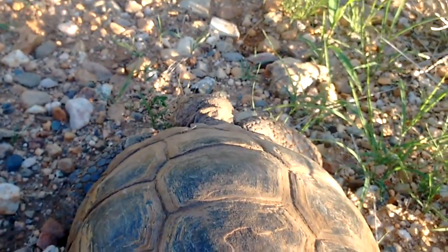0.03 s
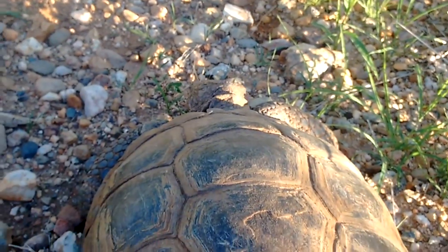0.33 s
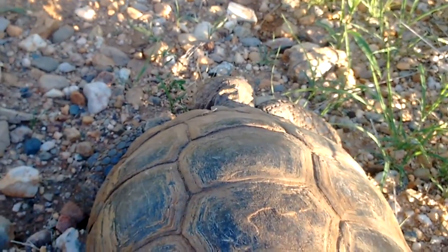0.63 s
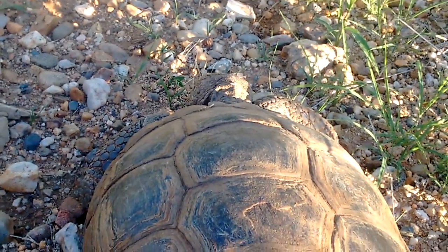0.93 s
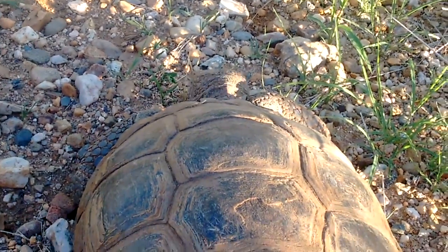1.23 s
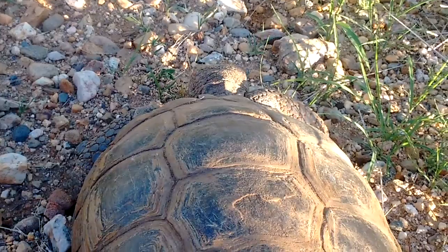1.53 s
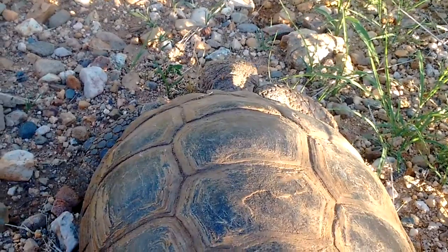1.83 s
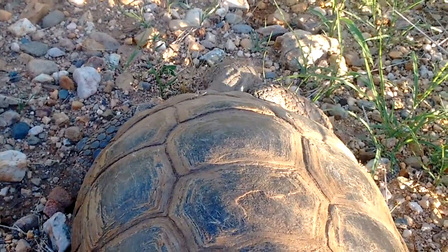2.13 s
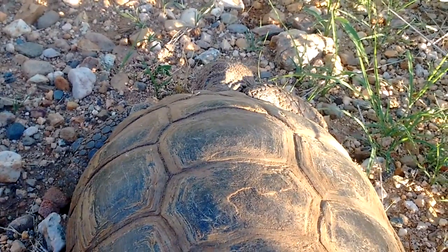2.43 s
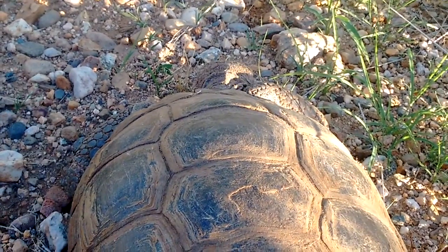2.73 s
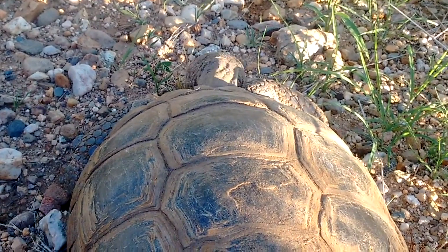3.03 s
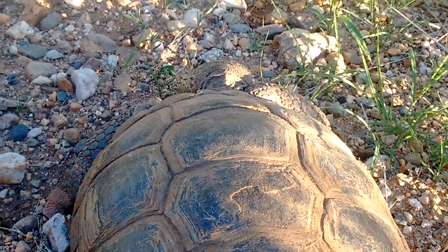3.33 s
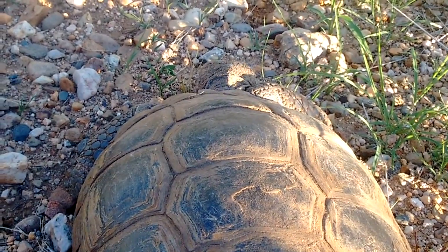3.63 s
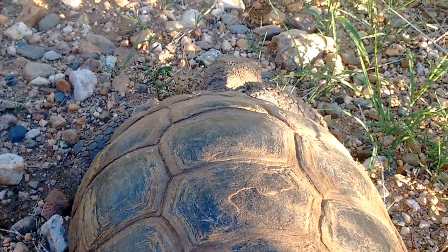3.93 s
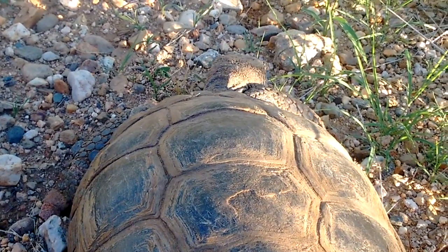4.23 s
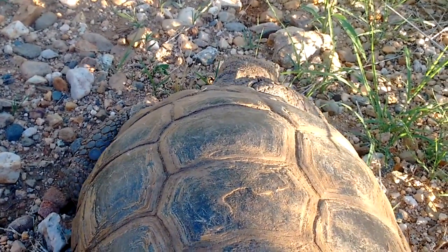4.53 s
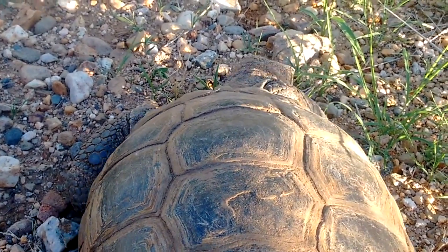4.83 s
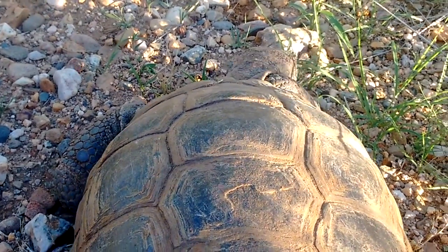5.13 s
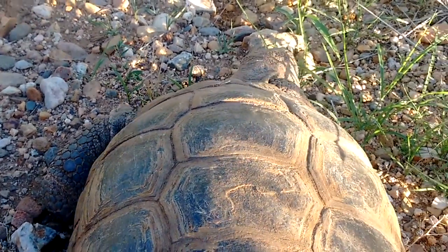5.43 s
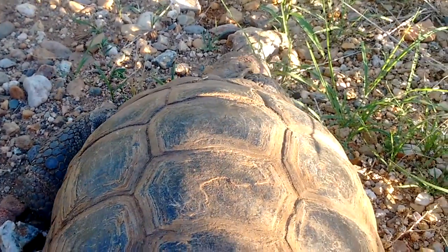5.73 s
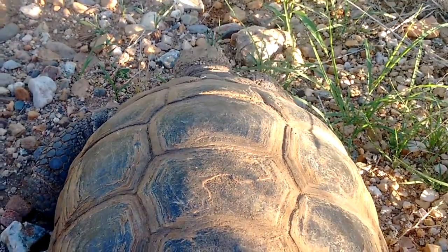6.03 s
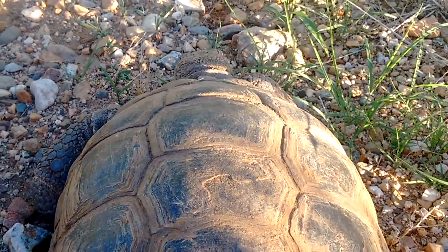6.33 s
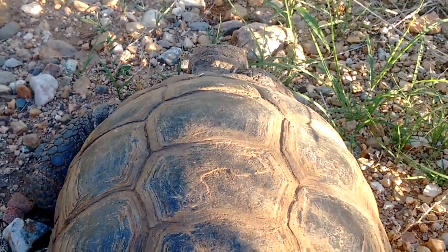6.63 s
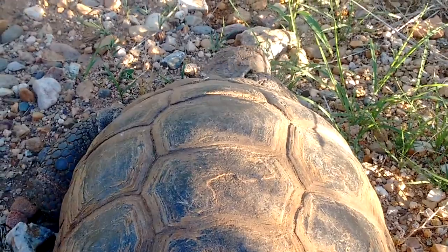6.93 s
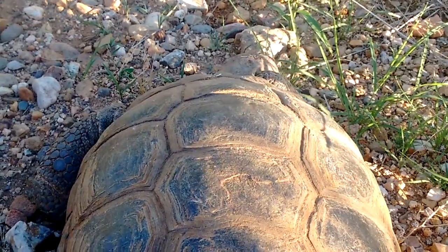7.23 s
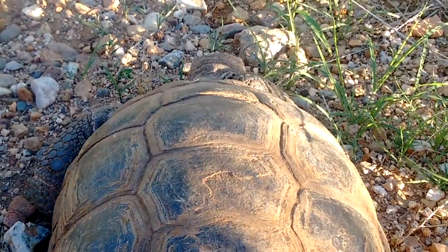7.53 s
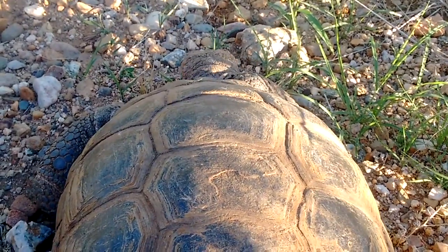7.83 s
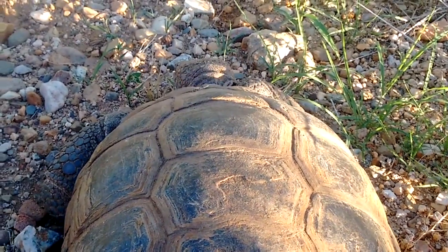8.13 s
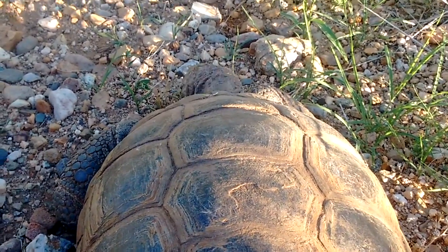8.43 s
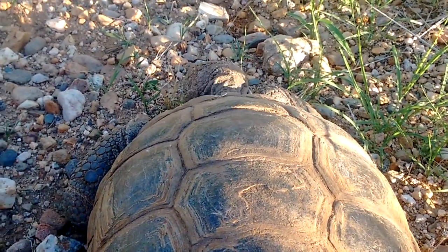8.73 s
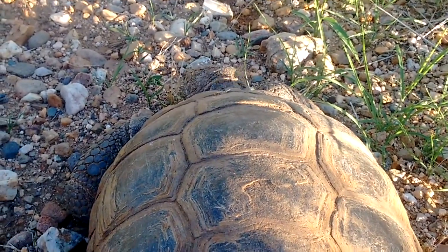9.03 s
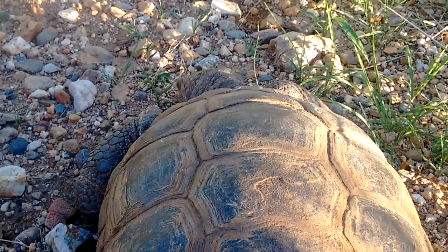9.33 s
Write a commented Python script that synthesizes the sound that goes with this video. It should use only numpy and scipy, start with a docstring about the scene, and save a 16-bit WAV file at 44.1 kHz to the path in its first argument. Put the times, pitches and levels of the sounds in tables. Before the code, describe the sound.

A tortoise faintly clicks and scuffs over gravel while a small bird chirps, until a loud wind gust buffets the microphone.

```python
"""A tortoise on dry gravel

A tortoise shifts its weight close to a pair of small microphones. Its feet scuff the grit and rub and
knock pebbles together, and its shell drags once over the stones. Further off, a small bird whistles two
phrases and there is one faint hoot. The air is nearly still until a gust buffets the microphones late on."""
import sys
import numpy as np
from scipy import signal
from scipy.fft import rfft, irfft, next_fast_len
from scipy.io import wavfile
from scipy.ndimage import uniform_filter1d

SR = 44100
rng = np.random.default_rng(int(sys.argv[2]) if len(sys.argv) > 2 else 0)


def waveform_to_disk(signal):
    """Save audio, clipped to [-1, 1], as 16-bit WAV at the path in sys.argv[1]."""
    frames = np.transpose(np.atleast_2d(signal))
    scaled = np.clip(frames, -1, 1) * 32767
    samples = np.round(scaled).astype(np.int16)
    wavfile.write(sys.argv[1], SR, samples)


N = 414099
TIME = np.arange(N) / SR
FFT_SIZE = next_fast_len(N + 4096)
FREQS = np.maximum(np.arange(FFT_SIZE // 2 + 1) * SR / FFT_SIZE, 1)


def from_db(db):
    """Turn decibels into a number to multiply by."""
    return 10 ** (np.asarray(db) / 20)


def rms_one(x):
    """Scale a signal so that its average strength (rms) is 1."""
    return x / np.sqrt(np.mean(x ** 2) + 1e-20)


def in_hz(rows):
    """Fill in a table's columns at every frequency."""
    hz, *columns = np.transpose(rows)
    return [np.interp(np.log(FREQS), np.log(hz), column) for column in columns]


def keep_band(x, kind, hz, order=2):
    """Keep the "low", "high" or middle "band" part of a sound."""
    return signal.sosfilt(signal.butter(order, hz, kind, fs=SR, output="sos"), x)


def filtered(x, response):
    """Give each frequency its own gain and delay."""
    return irfft(rfft(x, FFT_SIZE) * response, FFT_SIZE)[..., :N]


def coloured(x, spectrum):
    """Give a sound a tone colour that rings after each click, never before it (minimum phase)."""
    gain = rms_one(from_db(in_hz(spectrum)[0]))
    cepstrum = irfft(np.log(gain), FFT_SIZE)
    cepstrum[1:FFT_SIZE // 2] *= 2
    cepstrum[FFT_SIZE // 2 + 1:] = 0
    return filtered(x, np.exp(rfft(cepstrum)))


def drift(hz):
    """A smooth random wobble of about 1 either way; more hz makes it quicker."""
    step = 40  # samples between points
    pole = np.exp(-2 * np.pi * hz * step / SR)
    noise = rng.standard_normal(N // step + 2002)
    slow = signal.lfilter([1], [1, -2 * pole, pole * pole], noise)[2000:]
    return np.interp(np.arange(N) / step, np.arange(len(slow)), rms_one(slow))


def grains(per_s, spread_db):
    """Tiny clicks at random moments, mostly weak and a few strong; rms 1 at any rate."""
    sizes = from_db(spread_db * np.minimum(rng.exponential(1, N), 4))
    signs = rng.choice([-1, 1], N)
    hits = rng.random(N) < per_s / SR
    return rms_one(sizes * signs * hits / np.sqrt(per_s))


# how the two microphones differ: (frequency [Hz], left delay [cycles], left minus right [dB])
MIC_PAIR = [(500, 0, -0.5), (1200, 0, 0), (1705, 0.2, 0), (2250, .5, -0.5), (3550, 1, -3),
            (4960, 1.5, -4.5), (6000, 2, -4), (7430, 2.5, -3.5), (9580, 3.5, -4), (11830, 3.5, -8.5),
            (14400, 4, -12.5)]


def microphones(x):
    """Sound from ahead reaches the right microphone first; the left one gets less treble."""
    lag, balance_db = in_hz(MIC_PAIR)
    left = from_db(balance_db)
    pair = np.array([left * np.exp(-2j * np.pi * lag), np.ones_like(left)])
    return filtered(x, pair / np.sqrt((1 + left ** 2) / 2))


# the tone colour of still air: (frequency [Hz], level [dB])
AIR_COLOUR = [(30, -13), (120, 7.5), (400, 4), (800, 3), (1100, 1.5), (2200, -3.5), (3300, -4),
              (4500, -5.5), (7000, -8), (8700, -5), (11000, -10.5), (15000, -9)]


def air(level_db=-59.5, split_hz=6450.0):
    """The hush of open country: its lower part comes from ahead, its treble from all around."""
    hush = coloured(rng.standard_normal((3, N)), AIR_COLOUR)
    ahead = keep_band(hush[0], "low", split_hz, order=1)
    around = keep_band(hush[1:], "high", split_hz, order=1)
    return from_db(level_db) * microphones(ahead + around)


# the wind's strength, from still air through a breeze to one gust: (time [s], level [dB])
BREEZE = [(0, -57), (3.3, -57), (3.42, -49), (6.6, -57), (7.12, -40.5), (7.36, -25), (7.95, -28),
          (8.06, -21), (8.21, -16.5), (8.29, -33), (8.78, -30.5), (9.05, -56), (9.39, -44.5)]
# short puffs on top of it: (time [s], level [dB])
PUFFS = [(3.43, -40), (3.455, -35), (4.9, -39), (5.971, -38), (6.745, -34.5), (6.979, -25), (7.031, -30),
         (7.25, -16.5), (7.33, -19.5), (7.374, -17), (7.414, -15.5), (7.473, -10.5), (7.604, -15),
         (7.681, -11.5), (7.714, -16), (7.773, -15.5), (7.836, -14), (7.91, -25.5), (8.015, -23),
         (8.062, -16), (8.145, -10.5), (8.213, -20), (8.319, -23.5), (8.516, -26.5), (8.579, -26),
         (8.688, -23), (8.75, -25.5)]


def wind_strength(rise_s=0.012, fall_s=0.014):
    """The breeze in dB, with every puff swelling quickly and dying a little more slowly."""
    t = TIME[::40]
    power = from_db(np.interp(t, *np.transpose(BREEZE))) ** 2
    for peak, db in PUFFS:
        away = np.maximum((peak - t) / rise_s, (t - peak) / fall_s)
        power += (from_db(db) / np.cosh(np.minimum(away, 20))) ** 2
    return np.interp(TIME, t, 10 * np.log10(power))


# the tone colour of wind hitting a microphone: (frequency [Hz], level [dB])
BUFFET_COLOUR = [(20, -8), (50, 3), (110, 5), (190, -2.5), (280, -13.5), (400, -22.5), (550, -31.5),
                 (800, -49.5), (1500, -83)]


def wind(level_db=-0.5, lumpy_db=3.5, calm_db=-62.0, strong_db=-23.0):
    """Swirls of air push on one microphone and pull on the other; a strong gust adds smaller, higher ones."""
    gust_db = wind_strength()
    push, sway, breeze = rng.standard_normal((3, 1, N)) * np.array([[1], [-1]])
    # the smallest swirls reach one microphone alone
    small = keep_band(rng.standard_normal((2, N)), "high", 258.0, order=1)
    buffet = rms_one(coloured(push + from_db(-1.0) * small, BUFFET_COLOUR))
    rumble = rms_one(keep_band(sway + from_db(-12.5) * rng.standard_normal(N), "low", 64.3))
    force = np.clip(from_db(1.42 * (gust_db - strong_db)), 0, 1)
    flow = (force * buffet + (1 - force) * rumble) * from_db(lumpy_db * drift(28.0))
    # even out slow swells, so that the gust sets the loudness
    flow /= np.sqrt(uniform_filter1d(np.mean(flow ** 2, axis=0), size=1800) + 1e-12)
    calm = rms_one(keep_band(breeze, "band", [150, 400]))
    return from_db(gust_db + level_db) * flow + from_db(calm_db) * calm


def echoes(x, fade_s, delay_s):
    """Many faint echoes off bushes and ground, different on each side, fading 60 dB in fade_s."""
    t = np.arange(int(.25 * SR)) / SR
    tail = rng.standard_normal((2, len(t))) * from_db(-60 * t / fade_s) * (t > delay_s)
    tail /= np.linalg.norm(tail, axis=1, keepdims=True)
    return signal.fftconvolve(x[None], tail, axes=1)[:, :N]


# the shape of each named bird note: (time into the note [s], pitch [Hz], level [dB])
NOTE_SHAPES = { "rise": [(0, 4530, -12), (.022, 5080, -6), (.031, 5380, 0), (.04, 5600, -9)],
               "lift": [(0, 3530, 7), (.015, 3950, 11), (.035, 4250, -2)], "high sweep": [(0, 6270, 6),
               (.045, 6720, 2)], "low sweep": [(0, 2980, 2.5), (.06, 3440, 7.5)], "pip": [(0, 5700, -5),
               (.008, 5570, 0), (.032, 5380, -12)], "slur": [(0, 4020, -8.5), (.027, 3775, 4.5),
               (.055, 3110, -1), (.058, 3280, -26), (.061, 3950, -3.5), (.08, 3350, -11)],
               "whistle": [(0, 6040, -9), (.022, 5950, 1), (.048, 5770, 1), (.075, 5560, -9)],
               "arch": [(0, 5950, -8), (.012, 6360, 0), (.028, 6250, 0), (.075, 5780, -5)],
               "trill lead": [(0, 4200, -11), (.012, 3810, 2.5), (.024, 3350, -6), (.027, 3340, -18),
               (.031, 3600, -4), (.046, 3300, -6)], "trill": [(0, 4000, -9), (.011, 3680, 1.5),
               (.023, 3260, -3), (.026, 3400, -20), (.029, 3650, -4), (.045, 3260, -5)], }
# short named tunes made of those notes: (time into the tune [s], note name, accent [dB])
TUNES = { "opening": [(0, "high sweep", -2), (.114, "lift", 1.5), (.198, "low sweep", 4.5)],
         "pip": [(0, "pip", -3.5)], "rise": [(0, "rise", 0)], "descent": [(0, "slur", -1.5),
         (.125, "slur", 0.5), (.229, "whistle", 5)], "flourish": [(0, "rise", -1.5), (.044, "arch", -1),
         (.15, "rise", 3.5), (.196, "arch", 1)], }
# when each tune is sung: (time [s], tune name, level [dB])
SONG = [(.598, "opening", -72), (1.029, "pip", -58), (1.341, "descent", -60), (2.871, "rise", -48.5),
        (3.212, "flourish", -55), (4.914, "opening", -71.5), (5.231, "pip", -54.5), (5.931, "descent", -60),
        (6.603, "flourish", -53), (8.499, "pip", -54), (8.804, "descent", -61.5)]
# the trill that closes each phrase: (first note [s], last note [s], first level [dB], last level [dB])
TRILLS = [(3.539, 4.028, -51.5, -56), (6.922, 7.279, -54.5, -57)]


def bird(waver_hz=35.3, flutter_db=0.5, echo_db=-3.5, pitch_spread=0.0062, trill_step_s=.0705):
    """A nearly pure whistle glides through each note, turning hoarse and less even in the trills."""
    notes = [(start + after, name, db + accent_db)
             for start, tune, db in SONG for after, name, accent_db in TUNES[tune]]
    for first, last, first_db, last_db in TRILLS:
        count = round((last - first) / trill_step_s) + 1
        names = ["trill lead"] + ["trill"] * (count - 1)
        notes += zip(np.linspace(first, last, count), names, np.linspace(first_db, last_db, count))
    waver, flutter, rasp = waver_hz * drift(100), drift(58), .28 * drift(260)
    song = np.zeros(N)
    for start, name, db in notes:
        hoarse = "trill" in name
        when, hz, shape_db = np.transpose(NOTE_SHAPES[name])
        t = np.arange(int(when[-1] * SR)) / SR
        at = slice(round(start * SR), round(start * SR) + len(t))
        detune = (1 + hoarse) * pitch_spread * rng.standard_normal(len(hz))
        pitch = np.interp(t, when, hz * (1 + detune)) + waver[at]
        phase = 2 * np.pi * np.cumsum(pitch) / SR
        flicker_db = (1.25 + hoarse * flutter_db) * flutter[at]  # trills flutter by flutter_db more
        loudness = from_db(db + np.interp(t, when, shape_db) + flicker_db)
        loudness *= signal.windows.tukey(len(t), .15)  # soft start and end
        song[at] += np.sqrt(2) * loudness * (1 + hoarse * rasp[at]) * np.sin(phase)
    return song + from_db(echo_db) * echoes(song, fade_s=0.15, delay_s=0.0011)


# the bright tone colour of a hard contact, for sand and pebbles: (frequency [Hz], level [dB])
CRACK_COLOUR = [(3000, 6.5), (5500, -1.5), (7000, -5), (9000, 6), (12000, 3.5), (15000, -14)]
# the sharpest ticks of single grains: (time [s], level before the boost [dB])
TICKS = [(0.8194, -46.5), (1.4517, -47), (2.7794, -47), (2.9196, -34.5), (2.9397, -42), (3.354, -38),
         (3.6843, -42.5), (3.833, -43), (4.3732, -42), (4.5288, -40.5), (4.5529, -41), (5.043, -42),
         (5.194, -36.5), (5.232, -43), (6.7985, -37), (7.0456, -41), (7.444, -34), (7.724, -43.5)]


def ticks(faint_db=-70.0, boost_db=15.5, fade_s=0.0042):
    """Single sand grains tick now and then, a few of them sharply, each with a short bright rustle."""
    clicks = from_db(faint_db) * grains(per_s=20, spread_db=0.0)
    for start, db in TICKS:
        clicks[round(start * SR)] += from_db(db + boost_db)
    decay = from_db(-60 / (fade_s * SR)) ** 2
    power = signal.lfilter([1 - decay], [1, -decay], clicks ** 2 + 1e-18)
    return coloured(np.sqrt(power) * rng.standard_normal(N), CRACK_COLOUR)


def stone_tone(tones, t):
    """A struck stone rings with fading tones whose pitch and strength vary from hit to hit."""
    hz, db, fade_s = np.transpose(tones)[:, :, None]
    detune, strength, side = rng.standard_normal((3, len(tones), 1))
    waves = np.sign(side) * np.cos(2 * np.pi * hz * (1 + detune / 20) * t)
    tone = np.sum(waves * from_db(db + 2 * strength - 60 * t / fade_s), axis=0)
    return tone * (1 - np.exp(-t / 0.00048))  # the stone gives way in the soft ground


# the tones of a pebble's knock and of its higher ring: (pitch [Hz], level [dB], time to fade 60 dB [s])
KNOCK_TONES = [(1070, 2.5, 0.012), (1356, -11, 0.028), (1800, 4, 0.0077), (2060, -8.5, 0.011)]
RING_TONES = [(2170, 6.5, 0.0076), (2760, -3.5, 0.0095), (3396, -4.5, 0.013), (4050, -11, 0.0022)]
# pebble hits: (time [s], knock level [dB], thud over knock [dB], ring over knock [dB], thud pitch [Hz])
PEBBLE_HITS = [(1.089, -54.5, -6, 2.5, 580), (1.5686, -41.5, -28, 0, 600), (1.606, -47.5, -9, 10, 600),
               (1.622, -45, 0, 7, 623), (1.6413, -45, -1, 6, 597), (1.6638, -39, 3, 5, 567),
               (1.6843, -47.5, 5.5, 10.5, 450), (1.709, -38.5, -13, -3.5, 660), (1.77, -53, -6, -3, 600),
               (2.133, -58, 2, 0, 650), (2.252, -51, -16, -2, 890), (2.423, -55, 3, -7, 830),
               (2.438, -52.5, 4, -10, 640), (2.596, -39.5, 0, 4, 570), (2.669, -51, 0, 5.5, 500),
               (2.9096, -29, -5.5, -11.5, 464), (3.0152, -57, 8, -12, 690), (3.0812, -53.5, 5.5, -22, 820),
               (3.3547, -42.5, 4.5, -9.5, 390), (3.4793, -52, 15.5, 8, 560), (3.6213, -54, -2, -12, 553),
               (3.6906, -53, -1, 3, 540), (3.749, -46.5, -6, -8, 556), (3.9353, -54.5, 6, 0, 890),
               (3.988, -52, -19, 3, 600), (4.1497, -55, 0, 1.5, 596), (4.375, -49, -7, -27, 700),
               (4.7033, -54, 3, 14.5, 525), (5.1953, -56.5, 1, 3, 554), (5.406, -43.5, -16, -12, 600),
               (5.909, -54.5, -26, -5, 600), (6.103, -65, 15.5, -20, 750), (6.205, -63, -16, 10, 600),
               (6.371, -56, 3, -21, 555), (6.507, -44.5, 0, -2, 482), (7.444, -50, 11, 5.5, 398),
               (7.5458, -41, -8, -13, 820), (8.31, -50, 3.5, 4, 394), (9.365, -44.5, 2, -4, 585)]


def pebbles(thud_fade_s=0.012, crack_db=-6.0, crack_fade_s=0.0053, settle_db=-13.5, settle_fade_s=0.054):
    """Each stone thuds at its own pitch and knocks; hard hits ring and crack, and loose grit settles."""
    t = np.arange(int(.06 * SR)) / SR
    body, cracks = np.zeros((2, N + len(t)))

    def struck(sound, blow):
        """Give a sound a set energy, then play it for every click in the blow."""
        sound = sound * np.sqrt(.006 * SR) / np.linalg.norm(sound)
        return signal.fftconvolve(sound, blow)[:len(t)]

    for start, db, thud_db, ring_db, thud_hz in PEBBLE_HITS:
        at = slice(round(start * SR), round(start * SR) + len(t))
        loose = rng.standard_normal(len(t)) * (rng.random(len(t)) < 900 / SR)  # 900 grains a second
        loose *= from_db(-60 * t / settle_fade_s)
        blow = (t == 0) + from_db(settle_db) * loose / (np.linalg.norm(loose) + 1e-9)
        thud = [(thud_hz, 0, thud_fade_s)]
        for tones, part_db in ((thud, thud_db), (KNOCK_TONES, 0), (RING_TONES, ring_db)):
            body[at] += from_db(db + part_db) * struck(stone_tone(tones, t), blow)
        snap = rng.standard_normal(len(t)) * from_db(-60 * t / crack_fade_s)
        cracks[at] += from_db(db + ring_db + crack_db) * struck(snap, blow)
    return body[:N] + coloured(cracks[:N], CRACK_COLOUR)


# a faint hoot from far off: (start [s], length [s], pitch [Hz], level [dB])
HOOT = (1.462, 0.048, 620, -53)


def hoot():
    """One soft, pure note that swells and fades."""
    start, length, hz, db = HOOT
    progress = np.clip((TIME - start) / length, 0, 1)
    swell = np.sqrt(np.abs(np.sin(np.pi * progress)))
    return from_db(db) * swell * np.sin(2 * np.pi * hz * TIME)


def foot_pressure(start, length):
    """The push of one foot: it builds, holds and eases off."""
    return np.interp(TIME, start + length * np.array([0, 0.22, 0.41, 1]), [0, 1, 1, 0])


# the tone colours of coarse grit and of fine sand: (frequency [Hz], level [dB])
GRIT_COLOUR = [(100, -25), (300, 2), (550, 7), (760, 1.5), (1100, 7), (1500, -3.5), (2100, -0.5),
               (3200, -18), (4500, -21)]
SAND_COLOUR = [(200, -14), (480, 8.5), (850, 1), (1500, 9), (2200, 11), (3200, 4.5), (4400, 0),
               (7000, -6.5), (8800, -4.5), (11000, -2), (13700, -10), (16000, -32)]
# strokes of a foot through the gravel: (start [s], length [s], grit level [dB], sand level [dB])
FOOT_STROKES = [(1.506, 0.14, -63, -61.5), (1.589, 0.08, -48.5, -49), (1.606, 0.14, -54, -47),
                (2.092, 0.22, -65, -61.5), (2.362, 0.15, -66, -67), (2.739, 0.086, -59.5, -68),
                (2.892, 0.15, -61.5, -62), (3.036, 0.23, -61.5, -80), (3.297, 0.16, -68, -75),
                (4.392, 0.54, -68.5, -72), (5.09, 0.27, -69, -70), (5.408, 0.23, -61, -59.5),
                (7.519, 0.1, -62.5, -61), (7.926, 0.27, -60, -80), (9.355, 0.19, -63.5, -56)]


def scuffs(grit_boost_db=3.5, sand_boost_db=4.0, ordinary_stroke_db=-61):
    """Grit crunches and sand hisses under a dragging foot; the harder it presses, the more grains slip."""
    coarse, fine = from_db(-79.0), from_db(-73.5)  # both stir faintly under the resting animal
    for start, length, coarse_db, fine_db in FOOT_STROKES:
        pressure = foot_pressure(start, length)
        coarse = coarse + from_db(coarse_db) * pressure
        fine = fine + from_db(fine_db) * pressure
    crowding = (coarse / from_db(ordinary_stroke_db)) ** .9
    grit = coarse * grains(per_s=420 * crowding, spread_db=3.5)
    grit *= from_db(grit_boost_db + 5.54 * drift(15.0))
    sand = fine * grains(per_s=3500 * crowding, spread_db=3.0)
    sand *= from_db(sand_boost_db + 2.0 * drift(32))
    return coloured(grit, GRIT_COLOUR) + coloured(sand, SAND_COLOUR)


# the dull tone colour of rubbed stones: (frequency [Hz], level [dB])
RUB_COLOUR = [(150, -8), (500, -11), (750, -4.5), (950, 1), (1350, -1.5), (1800, -16), (3500, -23),
              (9000, -32)]
# a foot rubs one stone over another: (start [s], length [s], level [dB])
RUBS = [(2.412, 0.036, -45), (2.987, 0.05, -48), (3.101, 0.029, -54), (4.329, 0.049, -51),
        (4.577, 0.092, -52), (4.644, 0.026, -47), (6.031, 0.063, -50.5)]


def rubs():
    """Stone slips on stone under the animal's weight in a short, dull rasp."""
    pressure = sum(from_db(db) * foot_pressure(start, length) for start, length, db in RUBS)
    return coloured(grains(per_s=1100, spread_db=2.5) * pressure, RUB_COLOUR)


def diffuse(x, size=128):
    """The same sound arriving from ever-changing directions, different at each microphone."""
    _, _, pieces = signal.stft(x, nperseg=size)
    turns = np.exp(2j * np.pi * rng.random((2, *pieces.shape)))
    _, scattered = signal.istft(pieces * turns)
    return np.pad(scattered, ((0, 0), (size // 2, 0)))[:, :N]


def gravel(scatter_db=2.5, scatter_hz=3530.0, bass_cut_hz=203.0):
    """All the sounds underfoot: small stones give little bass, and the stones around scatter the treble."""
    direct = keep_band(pebbles(), "high", bass_cut_hz) + scuffs() + rubs() + ticks()
    treble = keep_band(direct, "high", scatter_hz)
    return direct + from_db(scatter_db) * diffuse(treble)


# the hollow tone colour of the shell: (frequency [Hz], level [dB])
SHELL_COLOUR = [(70, -10), (175, 4.5), (330, -1.5), (700, -5), (1050, 4), (1400, 3.5), (1800, -24),
                (2400, -14), (3600, -11.5), (4500, -18.5), (9000, -25)]
# its underside drags over the stones: (time [s], level [dB])
SHELL_DRAG = [(5.39, -54.5), (5.44, -45.5), (5.472, -39), (5.495, -47), (5.6, -53.5), (5.66, -61)]


def shell():
    """Stones stick and slip under the shell, which rings hollow."""
    when, db = np.transpose(SHELL_DRAG)
    touching = (TIME > when[0]) & (TIME < when[-1])
    pressure = from_db(np.interp(TIME, when, db)) * touching
    return coloured(grains(per_s=744, spread_db=1.0) * pressure, SHELL_COLOUR)


# single hard swirls of air that hit the microphones: (time [s], level [dB], pitch [Hz])
WIND_THUMPS = [(6.744, -32.5, 133), (6.974, -26.5, 197), (7.239, -15.5, 203), (7.323, -17.5, 200),
               (7.4042, -12, 290), (7.414, -8.5, 240), (7.48, -13, 186), (7.599, -17, 221),
               (7.6159, -12.5, 212), (7.635, -11.5, 180), (7.679, -8, 236), (7.693, -10.5, 191),
               (7.785, -13, 233), (8.136, -8.5, 198), (8.1428, -20.5, 436), (8.1722, -11, 207),
               (8.2101, -13, 212), (8.714, -21.5, 203)]


def wind_thumps(level_db=-0.5, width_cycles=0.27, uneven=0.86, uneven_hz=286.0):
    """A hard swirl is one swing of pressure; its quick part is stronger on one side than on the other."""
    t = np.arange(-400, 401) / SR
    thumps = np.zeros((2, N))
    for middle, db, hz in WIND_THUMPS:
        phase, lean = rng.standard_normal(2)
        cycles = hz * t
        swing = np.exp(-.5 * (cycles / width_cycles) ** 2) * np.sin(2 * np.pi * cycles + phase)
        quick = keep_band(swing, "high", uneven_hz)
        pair = swing * np.array([[1], [-1]]) + uneven * np.sign(lean) * quick
        start = round(middle * SR) - len(t) // 2
        thumps[:, start:start + len(t)] += from_db(db + level_db) * pair
    return thumps


def scene():
    """Tortoise, bird and hoot in the open air, with wind on the microphones."""
    return microphones(gravel() + shell() + bird() + hoot()) + air() + wind() + wind_thumps()


def record(dry, bottom_hz=20, top_hz=15600):
    """Cut the deepest rumble and the highest treble."""
    trimmed = keep_band(dry, "high", bottom_hz, order=1)
    return signal.sosfilt(signal.ellip(12, .1, 80, top_hz, fs=SR, output="sos"), trimmed)


dry = scene()
out = record(dry)
waveform_to_disk(out)
```